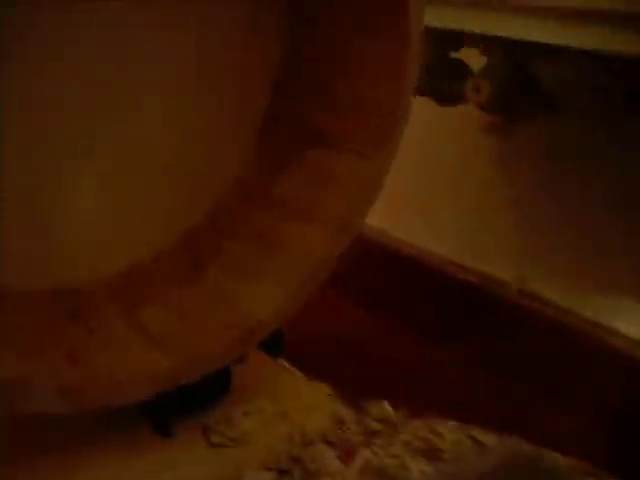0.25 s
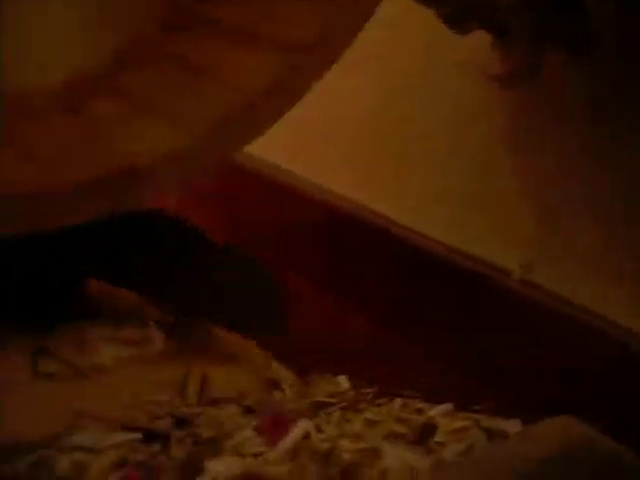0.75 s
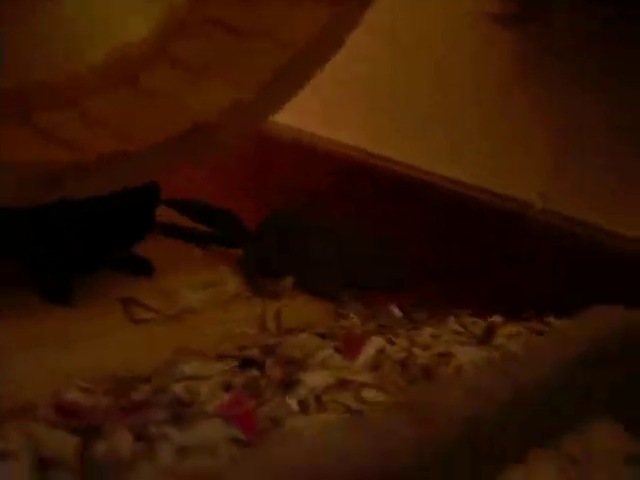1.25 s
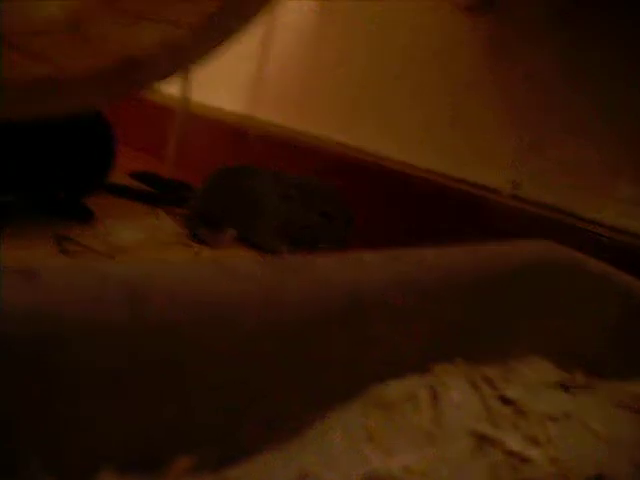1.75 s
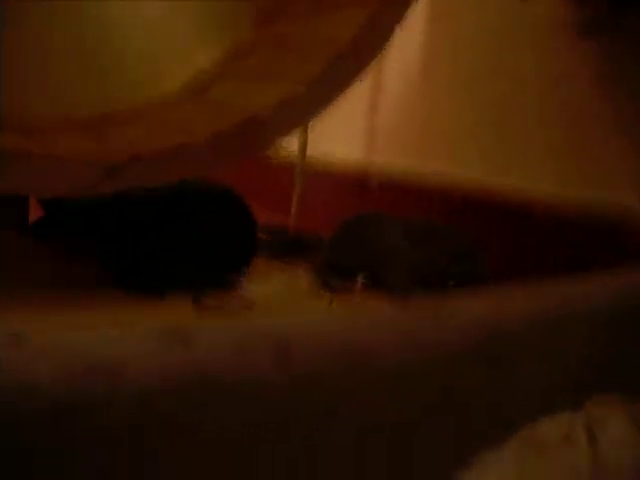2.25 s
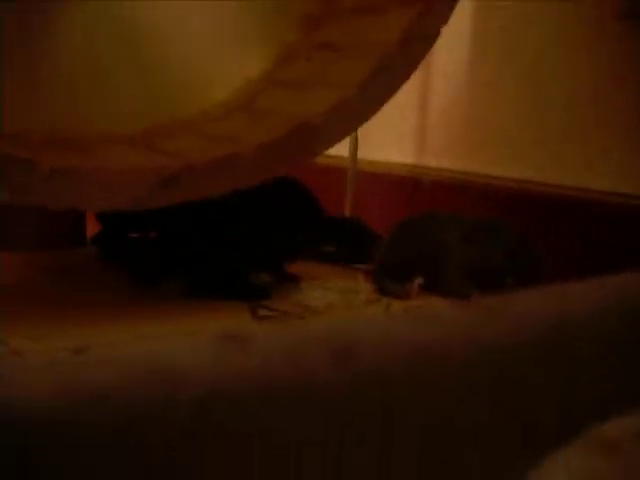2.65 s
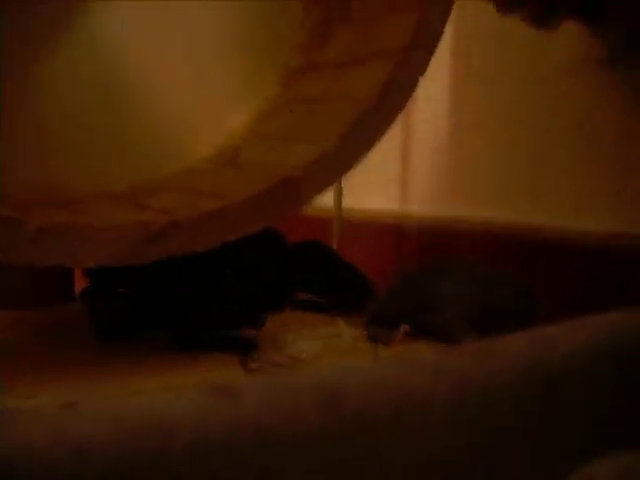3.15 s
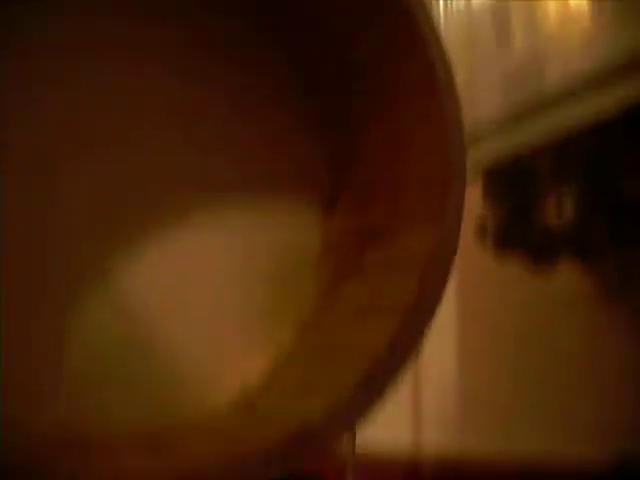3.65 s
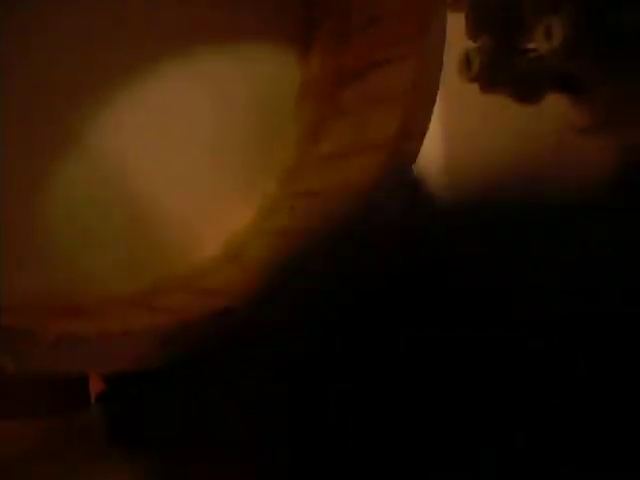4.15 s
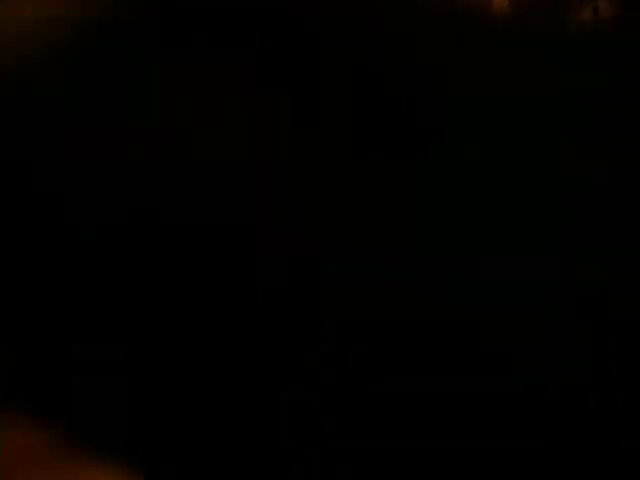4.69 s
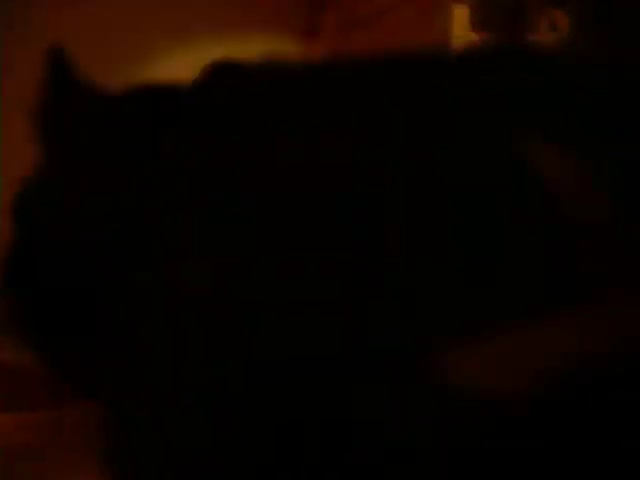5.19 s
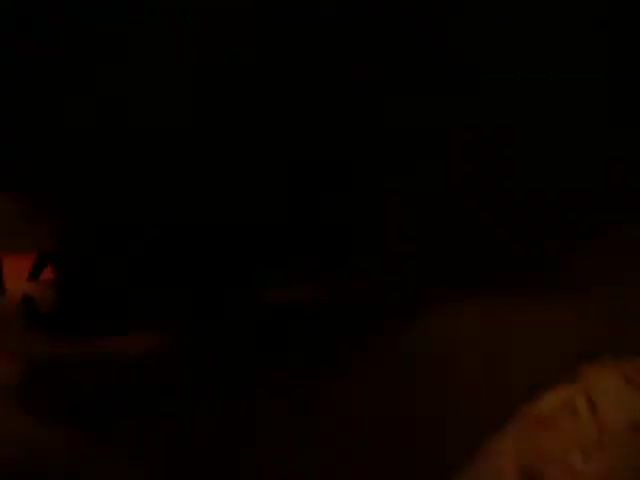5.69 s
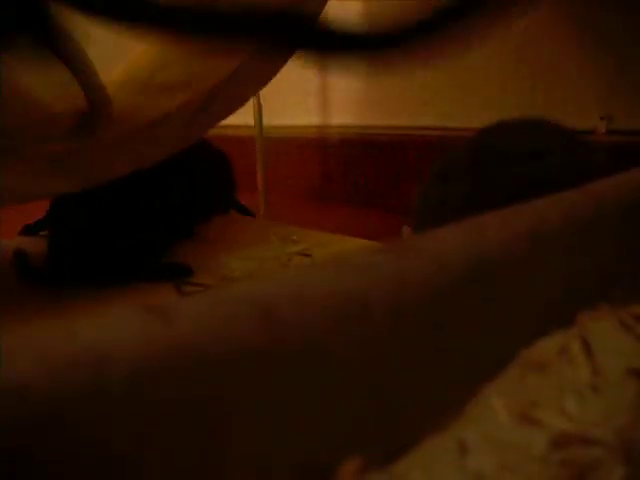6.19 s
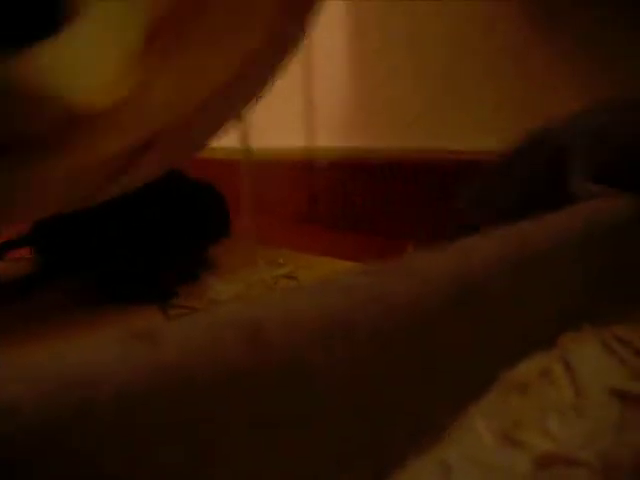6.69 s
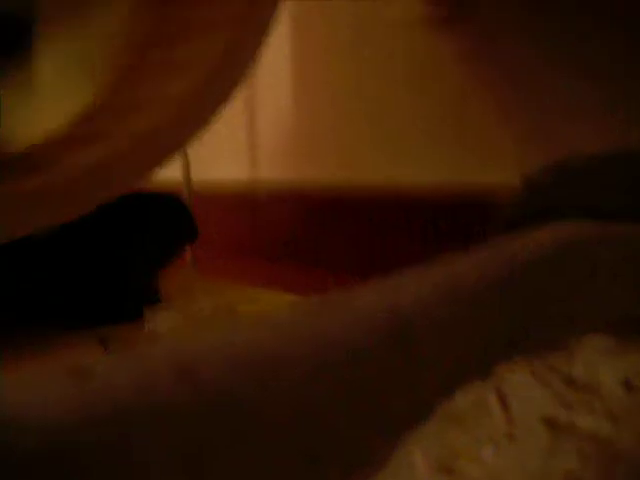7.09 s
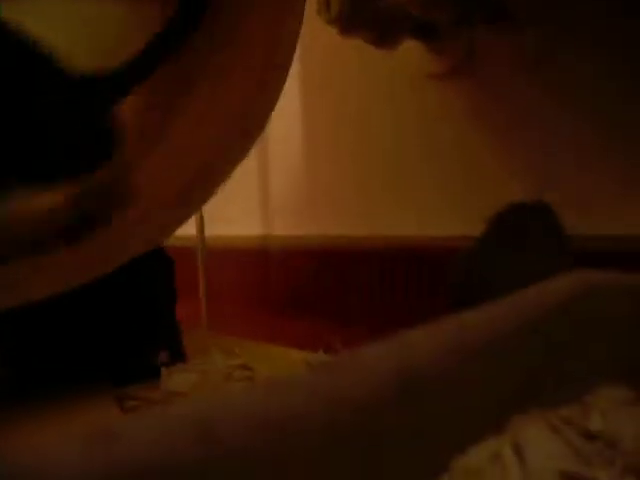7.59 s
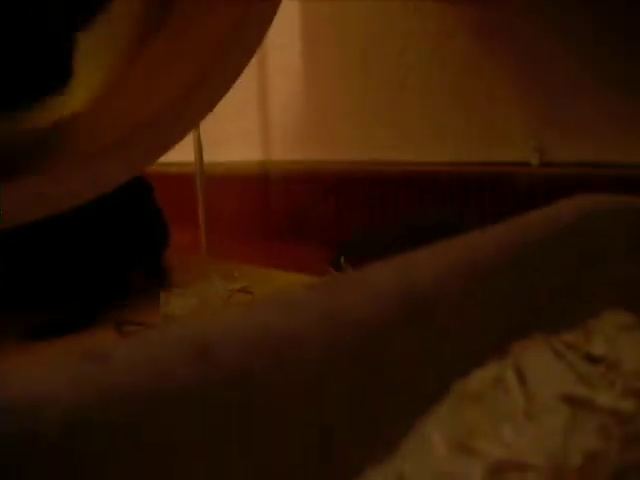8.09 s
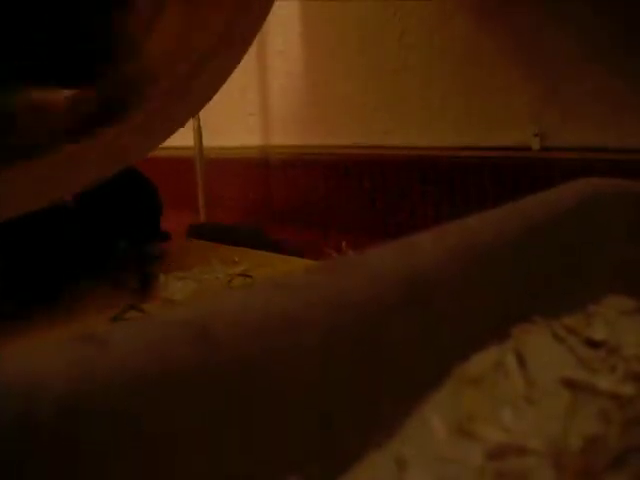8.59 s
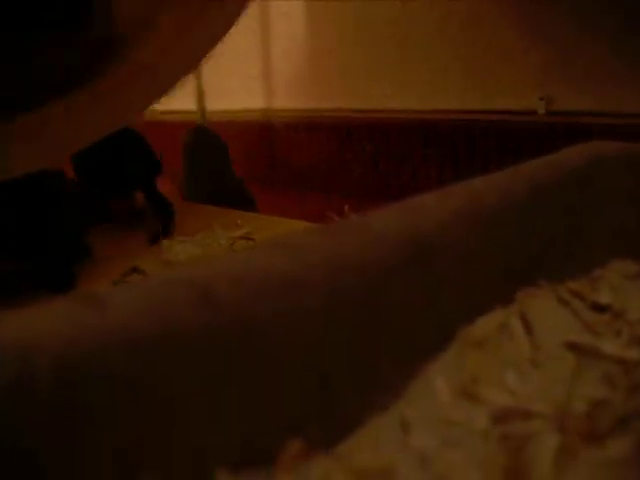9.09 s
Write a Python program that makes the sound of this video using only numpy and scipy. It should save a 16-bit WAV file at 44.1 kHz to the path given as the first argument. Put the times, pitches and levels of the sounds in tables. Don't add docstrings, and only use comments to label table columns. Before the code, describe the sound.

A small hand-held camera sits in a rodent cage, its microphone picking up contact through the plastic case. For the first 1.5 s there is mostly soft preamp hiss, faint rumble, a tiny tick, muffled floor knocks and a weak motor whine. At 1.5-1.9 s a dense burst of brittle cracks and a hard scrape overloads the input. Sharp knocks come around 2.6-2.8 s, then bright claw clatter and a scrape at 3.3-3.7 s and a thumping tick near 4 s. From 4.4 to 5.6 s, scattered snaps and rustles, with a low whine near 5. A loud clean crack lands at 5.7 s, then calm. A violent crunching scrape fills 6.6-6.8 s. Quiet motor rasps step about ten times a second until 8.6 s over a low hum, with a loud click at 7.5 s. Near-quiet, then harsh crackling at 9.05-9.35 s.

```python
import sys
import numpy as np
from scipy import signal
from scipy.fft import rfft, irfft
from scipy.io import wavfile
from scipy.ndimage import uniform_filter1d

SR = 44100
rng = np.random.default_rng(int(sys.argv[2]) if len(sys.argv) > 2 else 0)


def generate_wav(sig):
    pcm = np.round(np.clip(np.atleast_2d(sig).T, -1, 1) * 32767).astype(np.int16)
    wavfile.write(sys.argv[1], SR, pcm)


def field_ratio(decibels):
    return 10 ** (np.asarray(decibels, dtype=float) / 20)


N = 411894


def unit(x):
    return x / np.sqrt(np.mean(x ** 2))


def peak(x, db):
    return x * field_ratio(db) / np.abs(x).max()


def band(x, hz, width, order=1):
    edges = [max(hz - width / 2, 5), hz + width / 2]
    return signal.sosfilt(signal.butter(order, edges, "bandpass", fs=SR, output="sos"), x)


def highpass(x, hz, order):
    return signal.sosfilt(signal.butter(order, hz, "highpass", fs=SR, output="sos"), x)


def glide(hz):
    return np.sin(2 * np.pi * np.cumsum(hz) / SR)


def ring(hz, t60, size):
    t = np.arange(size) / SR
    return np.sin(2 * np.pi * hz * t) * 1000. ** (-t / t60)


def add(out, s, x):
    i = int(s * SR)
    out[i:i + len(x)] += x[:N - i]


def grains(rate, spread_db, tail_s):
    slips = (rng.random(N) < rate / SR) * field_ratio(spread_db * np.minimum(rng.exponential(size=N), 4))
    power = signal.lfilter([1], [1, -np.exp(-1 / (tail_s * SR))], slips ** 2)
    return unit(np.sqrt(power) * rng.standard_normal(N))


# frequency in Hz, level in dB per Hz.
HISS_SPECTRUM = [(14, -11), (30, 9), (42, -18), (308, -29), (435, -4), (1000, -1), (1730, -5), (7200, -9)]


def hiss():
    hz, db = np.transpose(HISS_SPECTRUM)
    colour = field_ratio(np.interp(np.log(np.fft.rfftfreq(N, 1 / SR) + 1), np.log(hz), db))
    return field_ratio(-45) * unit(irfft(rfft(rng.standard_normal(N)) * colour, N))


# start in seconds, level in dB, frequency in Hz, t60 in
# seconds.
KNOCK_RINGS = [(.399, -33, 67, .6), (.401, -26, 200, .03), (.429, -38, 220, .05), (.4736, -39, 67, .5),
               (.477, -37, 200, .04), (.61, -35, 105, .08), (1.995, -27, 144, .073),
               (2.64, -19, 450, .044), (3.968, -13, 320, .033), (3.972, -14.5, 138, .046),
               (3.412, -11, 420, .03), (3.415, -13, 280, .05), (7.533, -25, 100, .06),
               (1.672, -27, 620, .07), (1.665, -31, 2170, .09), (2.582, -33, 2150, .11)]


def thumps(size=20000):
    out = np.zeros(N)
    for s, db, hz, t60 in KNOCK_RINGS:
        add(out, s, -field_ratio(db) * ring(hz, t60, size))
    return out


# time in seconds, peak level in dB.
MOTOR_STEPS = [(6.831, -40.5), (6.925, -41.5), (7.124, -39.5), (7.223, -42), (7.313, -39), (7.41, -36.5),
               (7.6148, -41.5), (7.712, -40), (7.8144, -40.5), (7.9167, -38), (7.513, -40), (8.105, -40),
               (8.204, -37), (8.306, -37), (8.401, -40), (8.506, -37), (8.605, -37.5)]
# frequency in Hz, width in Hz, level in dB, lead in seconds, meshing level in dB.
GEAR_BANDS = [(140.3, 20, 3.5, 0.0096, -6), (1130, 210, 6.5, 0.0051, 0.5), (2170, 80, -5.5, -0.00039, -8),
              (2863, 157, 7, -0.0011, -7), (4300, 170, -8, .002, -14), (4800, 204, -4, -0.00054, -19),
              (5630, 240, 0, 0.0035, -22), (6850, 350, 2.5, 0.0024, -10), (4500, 4700, 0, 0.00227, -20)]


def gear_rasps(size=2600):
    drive, t = np.zeros(N), np.arange(size) / SR
    rasp = t / 0.0051 * np.exp(1 - t / 0.0061)
    for s, db in MOTOR_STEPS:
        add(drive, s - .004, field_ratio(db - 10) * rasp)
        add(drive, s + 0.0414, field_ratio(db - 21) * rasp)
    mesh = uniform_filter1d(drive, size=5000)
    out = np.zeros(N)
    for hz, width, db, lead_s, mesh_db in GEAR_BANDS:
        force = np.roll(drive, -int(lead_s * SR)) + field_ratio(mesh_db) * mesh
        out += field_ratio(db) * force * unit(band(rng.standard_normal(N), hz, width))
    return out


# start in seconds, end in seconds, first and last frequency in Hz, level in dB.
MOTOR_WHINES = [
    (0.419, 1.005, 561, 577, -55.5),
    (.6, 0.664, 1500, 1187, -49),
    (4.93, 5.168, 330, 342, -44.5),
    (6.896, 6.979, 247, 215.3, -41),
    (6.98, 8.6, 137.7, 141.7, -53),
    (7.701, 8.698, 576, 584, -54.5),
    (8.74, 8.93, 590, 579, -53),
]


def whines():
    out = np.zeros(N)
    for start, end, first_hz, last_hz, db in MOTOR_WHINES:
        n = int((end - start) * SR)
        wobble = 1 + 0.028 * unit(uniform_filter1d(rng.standard_normal(n), size=900))
        flutter = 1 + .4 * unit(band(rng.standard_normal(n), 40, 70))
        tone = glide(np.linspace(first_hz, last_hz, n) * wobble)
        add(out, start, field_ratio(db + 2.5) * flutter * signal.windows.tukey(n, .4) * tone)
    return out


def swells(t, rows, rise_db_per_s, fall_db_per_s):
    total = np.zeros((2, len(t)))
    for start, hold, dull_db, crisp_db in rows:
        before, after = np.clip(start - t, 0, 1), np.clip(t - start - hold, 0, 1)
        total += field_ratio(np.array([[dull_db], [crisp_db]]) - rise_db_per_s * before - fall_db_per_s * after)
    return total


# start in seconds, hold in seconds, dull level in dB, crisp level in dB.
SOFT_BRUSHES = [(1.672, 0.14, -40, -45), (1.885, 0.22, -41, -37), (2.308, 0.067, -45, -34.5),
                (2.444, 0.03, -42.5, -38.5), (2.572, 0.0023, -23.5, -35), (2.653, 0.0057, -33, -52),
                (2.797, 0.015, -34.5, -36), (3.05, 0.056, -44.5, -38.5), (2.924, 0.052, -45, -46),
                (3.32, 0.01, -58, -38), (3.597, 0.051, -47, -41), (3.736, 0.0079, -67, -31.5),
                (3.94, 0.059, -40.5, -33), (4.043, 0.012, -37, -24), (4.22, 0.018, -39.5, -45),
                (4.268, 0.052, -47, -33.5), (4.369, 0.094, -36.5, -58), (4.547, 0.012, -25, -52),
                (4.685, 0.12, -44.5, -61), (4.963, 0.0053, -39, -60), (5.033, 0.041, -37.5, -41),
                (5.138, 0.075, -37.5, -38.5), (5.299, 0.061, -39.5, -37), (5.426, 0.15, -42, -43),
                (6.945, 0.0095, -42, -50), (4.14, 0.015, -53, -44), (4.512, 0.018, -41, -42),
                (6.542, .04, -45, -44), (7.062, 0.14, -41, -49), (7.315, 0.75, -48.5, -58),
                (7.93, 0.083, -47, -45), (9.037, 0.032, -40, -48), (9.287, 0.0081, -46, -38)]
# start and hold in seconds, dull and crisp level in dB.
HARD_SCRAPES = [(1.543, 0.12, -20.5, -35), (1.783, 0.083, -26, -37.5), (3.375, 0.041, -14, -51),
                (3.42, 0.041, -42, -25), (6.59, 0.07, -25.5, -21.5), (6.654, 0.063, -18, -26),
                (6.736, 0.024, -23.5, -42), (6.805, 0.008, -26, -30.5), (5.718, 0.033, -30.5, -38),
                (7.023, 0.032, -30.5, -41), (9.05, 0.11, -30.5, -16.5), (9.3, 0.049, -22, -22)]


def brushing(t):
    rest = field_ratio(np.array([[-64.5], [-78.5]]))
    catch_power = uniform_filter1d(grains(400, spread_db=3, tail_s=0.001) ** 2, size=40)
    catches = np.sqrt(catch_power + .6)
    return rest + swells(t, SOFT_BRUSHES, 618, 608) + catches * swells(t, HARD_SCRAPES, 2501, 2501)


# time in seconds, frequency in Hz.
WALL_PITCH = [(1.53, 719), (1.6, 671.4), (1.7, 640), (1.83, 848), (2.58, 808.5), (2.64, 1449), (2.79, 1256),
              (3.28, 806), (3.38, 1615), (3.41, 1001), (3.97, 1092), (4.4, 1080), (4.46, 714.3),
              (4.61, 979.5), (4.71, 1500), (4.73, 746.6), (5.14, 1148), (5.33, 809.5), (5.72, 1070),
              (6.7, 988), (9.1, 1060), (9.32, 992)]


def wall_pitch(s):
    return np.interp(s, *np.transpose(WALL_PITCH))


# time in seconds, level in dB.
RUMBLE_LEVEL = [(0, -51.5), (.55, -48), (1.1, -51.5), (3.4, -48.5), (4.9, -49.5), (6.3, -51.5),
                (6.8, -44.5), (8.4, -46.5), (9.34, -52.5)]


def bedding():
    t = np.arange(N) / SR
    dull_gain, crisp_gain = brushing(t)
    slips = grains(4300, spread_db=3, tail_s=0.0022)
    wall = unit(band(slips, 160, 320) * glide(uniform_filter1d(wall_pitch(t), size=2500)))
    dull = unit(wall + field_ratio(-4) * unit(band(slips, 1280, 1100)))
    body, top = unit(band(slips, 3060, 3410, order=4)), unit(band(slips, 6860, 1000, order=2))
    crisp = unit(body + field_ratio(-13.5) * top)
    rumble = unit(band(grains(1300, spread_db=3.5, tail_s=0.0059), 120, 270))
    shake = field_ratio(np.interp(t, *np.transpose(RUMBLE_LEVEL)) + 1.5) + field_ratio(-50) * dull_gain
    return field_ratio(0.5) * dull_gain * dull + field_ratio(-8) * crisp_gain * crisp + shake * rumble


# start in seconds, peak in dB, wall and shaving frequency in Hz, rim level in dB.
CLEAN_SNAPS = [
    (5.7154, -10, 1130, 2250, 0),
    (5.7199, 0.5, 1160, 2260, -3),
    (5.7328, -7.5, 1160, 2950, -21),
]


def snaps(size=1200):
    out, rim = np.zeros(N), ring(3930, 0.0078, size)
    for s, db, wall_hz, chip_hz, rim_db in CLEAN_SNAPS:
        crack = ring(wall_hz, 0.01, size) + ring(chip_hz, 0.011, size) + field_ratio(rim_db) * rim
        add(out, s, -peak(crack, db))
    return out


# time in seconds, wall frequency in Hz,
# shaving frequency in Hz, snap level in dB.
CONTACT_SPOTS = [(1.5368, 777, 2270, -1), (1.5501, 734, 2410, -8), (1.5688, 720, 2400, -12),
                 (1.579, 760, 2800, -9), (1.5928, 668, 2270, -7), (1.604, 710, 2300, -18),
                 (1.6113, 730, 3060, -8), (1.6238, 706, 3080, -5), (1.6349, 640, 2300, -10),
                 (1.6499, 786, 2400, -11), (1.6592, 880, 2070, -2.5), (1.8006, 1010, 2620, -12),
                 (1.8365, 874, 3020, -11), (2.5781, 887, 2940, 2), (2.64, 1440, 2170, 0.5),
                 (2.7905, 1360, 3100, 0), (3.3787, 1667, 4740, -10), (3.3895, 1650, 4730, -5),
                 (3.4095, 1017, 4400, -14), (3.6276, 1730, 5700, -1), (3.9735, 1650, 3335, -12.5),
                 (4.4655, 710, 2270, -5), (4.5599, 1750, 3520, 1), (4.6096, 910, 2170, -1),
                 (4.6215, 1130, 2150, -19), (4.7101, 1630, 3360, -4.5), (4.7716, 761, 2250, 2),
                 (4.7949, 845, 3500, 1.5), (5.1136, 1180, 2750, -14), (5.1431, 1130, 2600, -15),
                 (5.2007, 1120, 3470, -5.5), (5.4767, 968, 3096, -3), (5.5485, 890, 3055, -4),
                 (3.277, 1650, 4660, -6), (3.314, 800, 4750, -6), (3.3255, 940, 4800, -3),
                 (3.366, 1550, 5250, -8), (3.372, 1600, 5300, -8), (3.4015, 1140, 4740, -8),
                 (3.4145, 628, 4600, -8), (3.4689, 1670, 5260, 1), (3.607, 1700, 5500, -1),
                 (3.645, 1700, 4900, -1), (3.657, 1530, 4800, -6), (5.1703, 1102, 3210, -20),
                 (5.2315, 800, 2447, -12), (5.3157, 800, 3200, -14), (5.4692, 970, 3100, -14),
                 (5.5203, 1600, 2540, -9),
                 (6.5915, 1278, 2080, -12), (6.611, 1040, 2320, -10), (6.6228, 1079, 2910, -10),
               (6.63, 990, 2700, -14), (6.6407, 1130, 2150, -18), (6.658, 1170, 2550, -7),
               (6.6738, 990, 1980, -6), (6.691, 1010, 2160, -9), (6.7022, 990, 2100, -14),
               (6.7121, 1017, 3320, -2.5), (6.7373, 995, 3440, -7), (6.8223, 960, 2120, -22),
               (6.9382, 1090, 2120, -2.5), (7.047, 1181, 3646, 0), (7.5361, 1030, 2155, -4),
               (9.0617, 1060, 2926, -10), (9.084, 1077, 1910, -2), (9.0987, 1060, 4140, 5),
               (9.114, 1160, 3018, -6), (9.125, 1060, 3000, -10), (9.154, 1190, 2190, -7),
               (9.3011, 1035, 2840, -16), (9.3207, 910, 2380, -7), (9.3295, 1035, 2210, -11),
               (9.3382, 958, 2170, -8)]


def spot(s, kind_hz):
    for spot_s, *own in CONTACT_SPOTS:
        if abs(spot_s - s) < .004:
            return own
    return wall_pitch(s), kind_hz * (1 + 0.026 * rng.standard_normal()), -4.5


# frequency in Hz, level in dB, t60 in seconds.
CASE_MODES = [(614, -8, .02), (1000, -2, .018), (1630, -5, .015), (2190, -3, .015), (2900, -5, .012),
              (3830, -4, .009), (5120, -6, .008), (6700, -10, .006)]


def case_modes(chance, size):
    return [field_ratio(db + 3 * a) * ring(hz * (1 + .04 * b), t60, size)
            for (hz, db, t60), a, b in zip(CASE_MODES, *chance)]


def strike(s, wall_db, crackle_db, contact_ms, kind_hz, jolt_db, size=1600):
    t = np.arange(size) / SR
    chance, grit = rng.standard_normal((2, len(CASE_MODES))), rng.standard_normal((3, size))
    wall_hz, chip_hz, snap_db = spot(s, kind_hz)
    rise = 0.00034 * contact_ms
    force = (t / rise * np.exp(1 - t / rise)) ** 2
    modes = case_modes(chance, size)
    wall = ring(wall_hz, 0.0099, size) + field_ratio(-8.5) * sum(modes[:3])
    chip = ring(chip_hz, 0.0046, size) + field_ratio(-9) * sum(modes[2:])

    chatter = force * (grit[0] + field_ratio(-20.5) * 2 * np.sin(2 * np.pi * wall_hz * t))
    dull = band(signal.fftconvolve(wall, chatter)[:size], 1857, 2790)
    scuff = band(force * grit[0], 1080, 1360, order=2)
    dull = peak(dull, 0) + peak(scuff, np.clip(-.8 * wall_db, 0, 20) - 18)

    body = ring(318 * (1 + 0.33 * chance[1, 0]), 0.046, size)
    jolt = signal.fftconvolve(body, force * grit[2])[:size]

    sing = field_ratio(-20) * 2 * np.sin(2 * np.pi * chip_hz * t)
    spikes = force * (grit[1] * np.abs(grit[2]) + sing)
    crisp = peak(signal.fftconvolve(chip, spikes)[:size], 0)
    crisp = crisp + peak(band(spikes, 1900 + 0.51 * chip_hz, 2710, order=2), 0.3)
    if chip_hz > 4300:
        crisp = peak(highpass(crisp, 4000, 3), 3) + peak(band(spikes, 5100, 1800), -2.5)
    else:
        crisp = crisp - .6 * band(crisp, 5620, 1150)
    crisp = crisp + peak(band(spikes, 6990, 1500), snap_db)

    blow = peak(dull, wall_db - .3) + peak(jolt, wall_db + jolt_db) + peak(crisp, crackle_db + 1)
    return s - 1.3 * rise - .0004, blow


# time of the peak in seconds, wall
# level in dB, crackle level in dB, contact time in ms.
CHIP_BLOWS = [(1.537, 6.5, 3.5, 6.6), (1.558, -6, -39, 5.9), (1.5695, -4, -28, 6.8), (1.58, -21, -13, 3.4),
              (1.5914, 11, -19, 6), (1.6034, -3.5, -4, 2.7), (1.6106, -1.5, -22, 3.6),
              (1.6352, -4.5, -7, 3.7), (1.649, 0, -6, 3.25), (1.6599, 11, 8.5, 4.1),
              (1.8271, -6.5, -19, 6.9), (2.579, 4, -5.5, 5.25), (2.6398, -12.5, -1, 4.3),
              (2.8217, -15.5, -21.5, 3), (3.277, -21, -40, 7.8), (3.3269, -18.5, -28, 6.5),
              (3.4689, -17, -20.5, 7.6), (3.656, -26, -35, 6), (3.983, -12, -22, 8),
              (4.4622, -20, -11.5, 4.5), (4.5129, -19, -19.5, 4.9), (4.6089, 3, 1, 3.94),
              (4.769, -12.5, -12, 5.5), (5.5199, -27, -14.5, 1.37), (6.5906, -4, 1.5, 2.56),
              (6.6912, 6, 4, 3.6), (6.7014, -2, -6, 2.96), (6.7121, 13.5, 4, 3.5), (6.7364, 3, -8.5, 6.2),
              (9.3382, -1, -41, 3.81)]
CURL_BLOWS = [(1.549, -1, -16, 2.3), (1.725, -39, -23.5, 2.3), (1.7893, -12, -29, 2.7),
              (1.7988, -11, -26, 1.86), (1.818, -13, -20, 1.6), (4.622, -9, -10, 6.9),
              (5.2316, -27, -21, 4.8), (5.3283, -20, -25, 7.5), (5.8095, -37, -27, 1.8),
              (7.185, -22.5, -40, 4.7), (5.7503, -20, -26, 3.7), (6.599, -13, -20, 1.77),
              (6.6114, -15, 0, 4), (6.6304, -4.5, -8.5, 3.7), (6.6402, -6, -20, 7.1), (6.6575, 2, -25, 4),
              (6.666, 7, -19, 6.7), (6.7455, -9.5, -16, 4.35), (6.821, -6.5, -15.5, 2.63),
              (6.9384, -9.5, -4.5, 3.6), (7.5356, 0, 10, 2.8), (9.0633, -17, -8, 4.2), (9.1154, -5, 1.5, 5),
              (9.1243, -7, -9, 2.1), (9.1551, -12, 5.5, 4.6), (9.289, -22, -24, 5.3),
              (9.3092, -3, -6.5, 4.6), (9.3146, -1.5, -5, 3.02), (9.3218, -6, -1.5, 5.8),
              (9.3292, 2, -32, 4.8),
              (1.642, -11, -17, 3.7), (1.654, -8, -9, 2.4), (1.666, -10, -18, 3.7),
                  (2.568, -12, -24, 7.4), (3.392, -12, -12, 3.5), (3.414, 2, -14, 4), (6.679, 1, -4, 4.2),
                  (6.696, -3, -9, 3.25), (7.528, -38, -21.5, 2.84), (7.566, -32, -26, 1.8),
                  (9.0663, -7.5, -13, 3.9), (9.089, -11, -2, 3.3), (9.148, -25, -8, 3.2),
                  (9.1595, -8, -1, 2.45), (9.2831, -30, -26, 4.6), (9.2975, -4.5, -23, 3.24),
                  (9.3249, -19, 0, 2.1), (9.3345, -9, -9, 2.76)]
FLAKE_BLOWS = [(.284, -56, -26, 2.4), (1.623, -1, -10, 1.8), (1.8371, -6.5, -25, 7.3),
               (2.791, -12, -8, 5.9), (5.0056, -18, -17.5, 3.8), (5.1145, -23, -13, 7.5),
               (5.1425, -32, -9.5, 3.4), (5.1624, -18.5, -22, 3.8), (5.354, -22, -22.5, 7.1),
               (5.4692, -32, -14.5, 2.2), (5.4779, -11, -17, 8), (5.5481, -15.5, -17.5, 12.4),
               (5.5652, -22.5, -31, 5.7), (7.024, -33, -23, 3), (6.6209, -7, -6, 5.64),
               (6.6829, 0, -6, 2.7), (6.7565, -21, -33, 4.1), (6.8147, -16, -30, 7.3),
               (6.944, -4, -11.5, 2.95), (7.036, -24, -16.5, 9.3), (7.1195, -18.5, -29, 4.1),
               (9.0789, -14, -2.5, 3), (9.0843, 0, 5.5, 3.9), (9.3, -12, -32, 3.2)]
SLIVER_BLOWS = [(1.861, -12.5, -35, 6.3), (2.6344, -28, -9, 2.4), (4.274, -35, -26, 2.7),
                (3.966, -12.5, -6, 5.7), (3.9732, -11.5, 1, 4.4), (4.4968, -39, -15, 1.4),
                (4.5495, -29, -12, 4.6), (4.6159, -48, -5, 3.6), (4.7102, -13, -6, 2.4),
                (4.7302, -17.5, -24, 2.6), (4.7948, -14, -5.5, 2.4), (5.17, -48, -13.5, 9.6),
                (5.2003, -16, -5, 3.3), (5.3157, -38, -17, 1), (5.805, -34, -27, 4.4),
                (6.6748, 12.5, 3, 3.7), (6.766, -37, -25, 3), (7.047, -13.5, -14.5, 5),
                (7.4441, -21.5, -19.5, 2.6), (7.683, -25, -14, 1.04), (9.049, -37, -12, 5.6),
                (9.0983, 1.5, 5.5, 2.34), (9.1076, -10, -28, 7.7), (9.133, -22, -30, 3.4),
                (9.1392, -25, -13, 12), (9.1531, 6.5, -5, 1.9)]
CLAW_BLOWS = [(2.5531, -21.5, -29, 10.6), (2.6509, -10.5, -20, 11.7), (2.688, -24, -28, 7.2),
              (3.3665, -20, -16, 4.2), (3.3778, 5, 7.5, 4.3), (3.3896, 4.5, -2, 5.5),
              (3.4015, -12, -8, 6.3), (3.409, 8, 7.5, 2.7), (3.607, -44, -23, 1.5), (3.6278, -18, -12, 1.5),
              (3.645, -27, -16.5, 1.5), (4.5602, -8, 5, 2.55), (7.653, -45, -20.5, 5.3)]
STRAY_SLIVERS = [(1.7165, -34, -36, 1.7), (2.799, -24, -17.5, 3.3), (3.314, -20.5, -34, 5.1),
                 (3.372, -18, -24, 2.3), (3.987, -30, -22, 1.8), (4.4668, -11.5, -11.5, 3),
                 (4.726, -39, -26, 1.3), (5.03, -40, -26, 2), (5.048, -42, -29, 2), (5.153, -24, -31, 1.8),
                 (9.0615, -9, -15, 2.4)]
BODY_JOLTS = [-26.5, -33, -15, -35, -17]


def ticks():
    tables = [CHIP_BLOWS, CURL_BLOWS, FLAKE_BLOWS, SLIVER_BLOWS, CLAW_BLOWS, STRAY_SLIVERS]
    pitches = [1920, 2600, 3165, 3470, 4120, 3470]
    out = np.zeros(N)
    for table, kind_hz, jolt_db in zip(tables, pitches, [*BODY_JOLTS, -25]):
        for row in table:
            add(out, *strike(*row, kind_hz, jolt_db))
    return highpass(out, 270, 2)


def scene():
    return (hiss() + thumps() + gear_rasps() + whines() + bedding() + snaps() + ticks())[None]


def band_limit(x):
    return signal.sosfilt(signal.butter(12, 16820, fs=SR, output="sos"), x)


def record(dry):
    limit = .715
    narrow = signal.sosfilt(signal.butter(6, 7500, fs=SR, output="sos"), dry)
    coarse = np.clip(signal.resample_poly(narrow, 160, 441, axis=1), -limit, limit)
    smoother = signal.firwin(441 * 34 + 1, 1 / 441, window=("kaiser", 9))
    fine = signal.resample_poly(coarse, 441, 160, axis=1, window=smoother)[:, :N]
    lowpass = signal.firwin(121, 15900, window=("kaiser", 2), fs=SR)[None]
    flat = signal.oaconvolve(np.clip(fine, -limit, limit), lowpass, mode="same")
    return band_limit(flat)


dry = scene()
out = record(dry)
generate_wav(out)
```